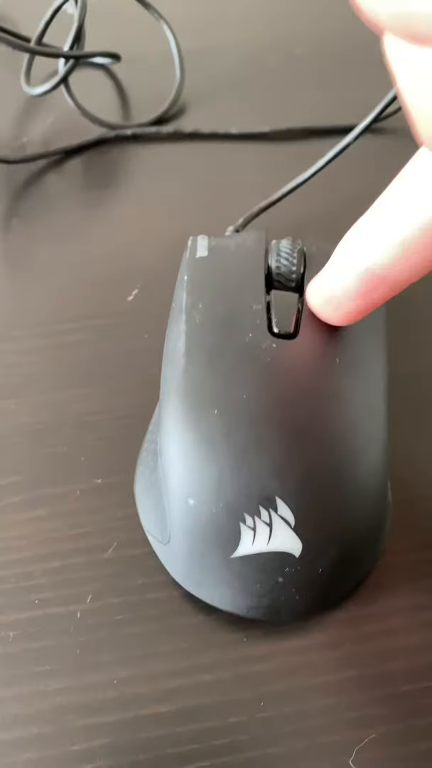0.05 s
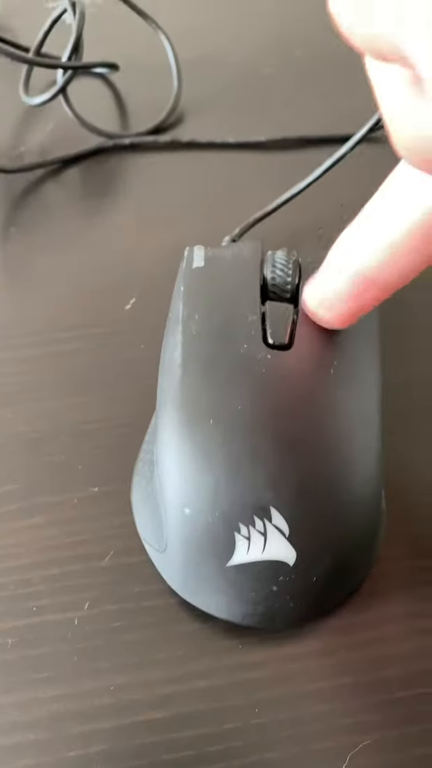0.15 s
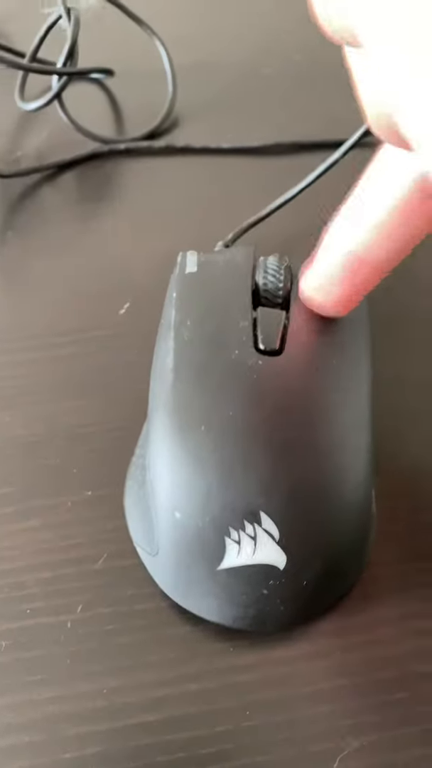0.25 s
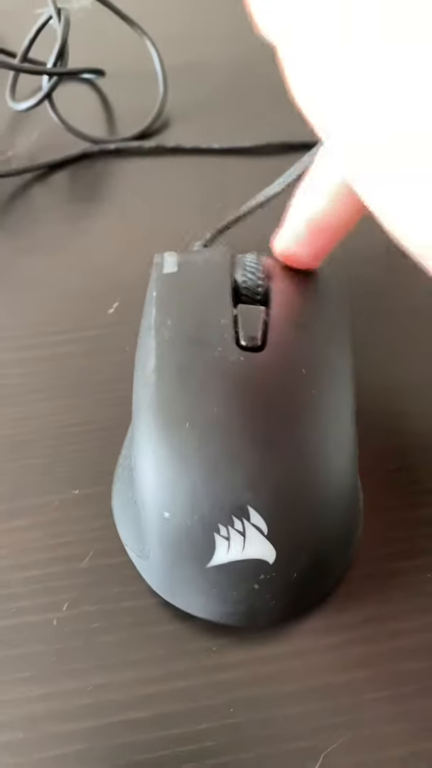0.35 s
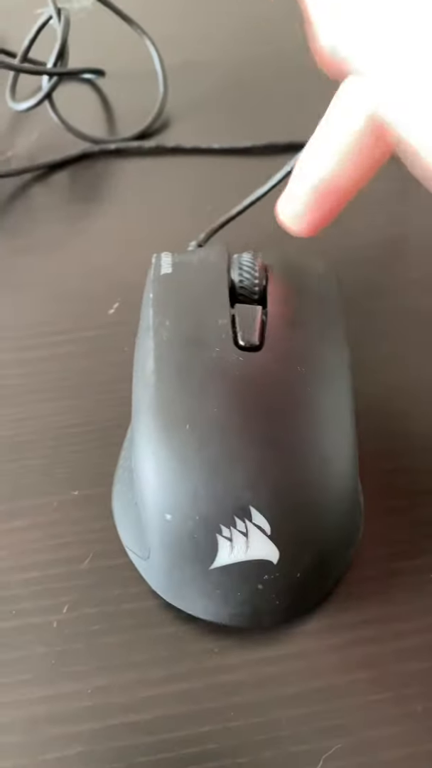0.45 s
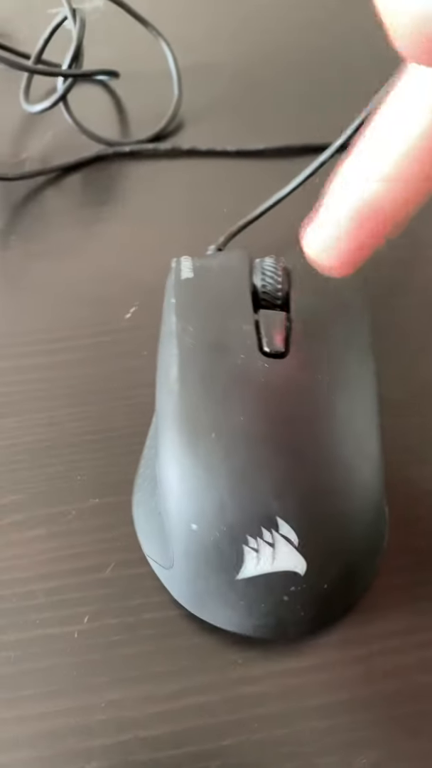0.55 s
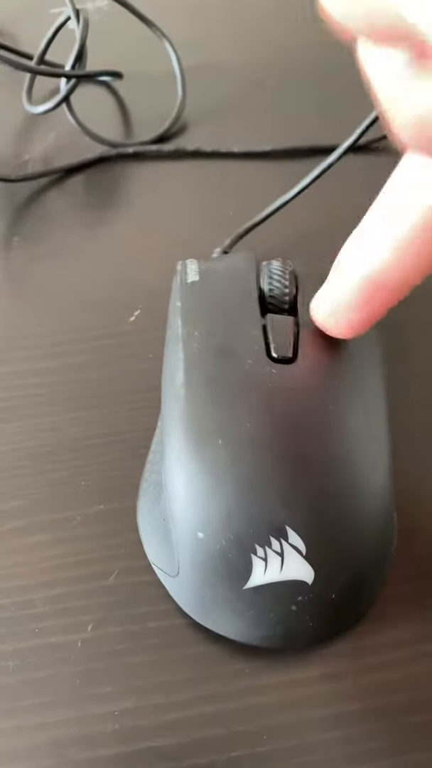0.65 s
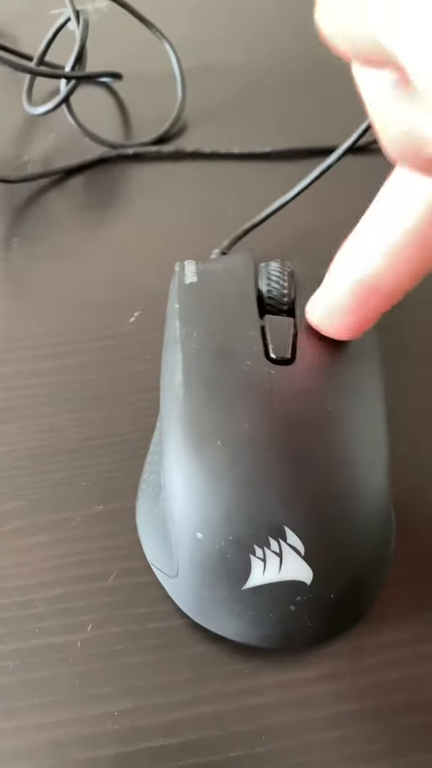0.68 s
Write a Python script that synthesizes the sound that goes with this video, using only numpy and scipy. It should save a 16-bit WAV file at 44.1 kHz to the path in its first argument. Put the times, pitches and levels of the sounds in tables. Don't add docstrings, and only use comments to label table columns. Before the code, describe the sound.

A finger flutters on a mouse button, making sharp, dry, uneven clicks in quick bursts

```python
import sys
import numpy as np
from scipy import signal
from scipy.fft import rfft, irfft
from scipy.io import wavfile

SR = 44100
rng = np.random.default_rng(int(sys.argv[2]) if len(sys.argv) > 2 else 0)


def transcribe(u):
    v = np.clip(np.atleast_2d(u).T, -1, 1)
    q = np.round(v * 32767).astype(np.int16)
    wavfile.write(sys.argv[1], SR, q)


def to_linear_factor(level_db):
    exponent = np.asarray(level_db, float) / 20
    return 10 ** exponent


N = 99225

# [t/s, level/dB, shell knock/dB, treble tilt/dB per octave, contact/ms]
SNAPS = [(0.071, -45.5, 3.5, 2.5, 0.66), (0.1145, -38.5, 4.5, -7.5, 0.75), (0.1622, -31, 3.5, -2, 0.57),
         (0.216, -20.5, -10, 2, 0.82), (0.272, -19.5, -9, 4, 1.5), (0.3445, -16, -9.5, 1, 0.71),
         (0.347, -20, -4.5, -1.5, 1.12), (0.4084, -17.5, -14.5, -2.5, 1.75), (0.6911, -15, -12.5, 10, 0.32),
         (0.7524, -17.5, -7.5, 0.5, 1.3), (0.7972, -22.5, -7, 7, 0.66), (0.8019, -14, -6, -4.5, 0.95),
         (0.8521, -20.5, -22, 3.5, 1), (0.8591, -18.5, -21, 2.5, 0.87), (0.8679, -22.5, -7.5, 6, 0.78),
         (0.89, -17.5, -6.5, 1.5, 2.4), (0.9159, -17.5, -6, 10, 1), (0.9226, -21.5, -6.5, 3.5, 0.88),
         (0.965, -17, -8, 4, .8), (1.1561, -17, -14, -5.5, 0.46), (1.2163, -21, -24, -3, 1.4),
         (1.276, -19.5, -1.5, 3, 0.71), (1.3287, -19, -12.5, 2.5, 1.1), (1.3676, -18.5, -26.5, 6.5, 0.57),
         (1.3777, -19.5, 0.5, 2, 0.76), (1.4601, -19, -13, 10.5, 1.2), (1.7122, -17.5, -18, 9, 0.24),
         (1.7465, -21, -8.5, 3, 1.3), (1.7854, -16.5, -15.5, -0.5, .6), (1.9731, -15, -13.5, 4, 0.98)]
# [f/Hz, level/dB, t60/s]
SPRING_MODES = [(4300, -19, .003), (5200, -15, .004), (5700, -15, .003), (6500, -5, .003), (6950, 0, .004),
                (7600, -6, .003), (8500, -12, .003), (9500, -11, .003), (10300, -11, .004),
                (11400, -17, .003), (12500, -14, .003), (13400, -10, .004), (14500, -23, .003),
                (15500, -19, .003)]
# [f/Hz, level/dB, t60/s]
SHELL_MODES = [(492, -13, 0.041), (581, -11.5, 0.018), (703, -12.5, 0.036), (796, -8.5, 0.033),
               (872, -12, 0.037), (921, -8, 0.0078), (1248, -11, 0.0078), (1570, -12, 0.0057),
               (2056, -13, 0.007), (2390, -12.5, 0.017), (2930, -14.5, 0.017), (3730, -4.5, 0.0019),
               (5600, -2.5, 0.0033)]
SHELL_ALIKE = 0.5


def ring(x, hz, t60):
    pole = np.exp(2j * np.pi * hz / SR - np.log(1000) / (t60 * SR))
    return signal.lfilter([1], [1, -pole], x).imag


def place(times, shapes):
    length = shapes.shape[1]
    out = np.zeros(N + length)
    starts = (np.asarray(times) * SR).astype(int)
    np.add.at(out, starts[:, None] + np.arange(length), shapes)
    return out[:N]


def band(x, hz):
    return signal.sosfilt(signal.butter(2, hz, "band", fs=SR, output="sos"), x)


def thin(x):
    return signal.sosfilt(signal.butter(4, 3300, "high", fs=SR, output="sos"), x)


def push(ms):
    u = np.arange(1024) / SR / (np.clip(ms, .05, 20)[:, None] / 1000)
    force = np.sin(np.pi * np.clip(u + .05, 0, 1)) ** 2
    return force / force.sum(axis=1, keepdims=True)


def strike(modes, detune):
    f, _, t60 = np.array(modes).T
    t = np.arange(int(t60.max() * SR)) / SR
    fade = np.exp(-np.log(1000) * t / t60[:, None])
    return np.sin(2 * np.pi * (f * detune)[:, :, None] * t) * fade


def pair(modes, times, db, shapes, alike, signs=(-1, 1), detune=.05):
    # [f/Hz, level/dB]
    lean_table = [(100, -7), (300, 4.5), (650, 11), (1300, -1.9), (2800, 9), (5000, 9.8)]
    lean_hz, lean_db = np.array(lean_table).T
    f, level_db, _ = np.array(modes).T
    lean = np.interp(np.log(f), np.log(lean_hz), lean_db) / 2
    chance = rng.standard_normal((len(times), 5, len(modes)))
    a, b = (np.where(chance[:, k] > 0, *signs) * to_linear_factor(-2 * chance[:, k + 2]) for k in (0, 1))
    left = a * to_linear_factor(level_db - lean)
    right = (alike * a + np.sqrt(1 - alike ** 2) * b) * to_linear_factor(level_db + lean)
    rings = strike(modes, 1 + detune * chance[:, -1])
    blows = shapes * to_linear_factor(db)[:, None]
    sides = []
    for mix in (left, right):
        body = np.einsum("ek,ekt->et", mix, rings)
        sides.append(place(times, signal.fftconvolve(blows, body, axes=1)))
    return np.array(sides)


def air():
    # [f/Hz, level/dB per Hz]
    tone = [(30, -10), (80, 5.5), (200, -14.5), (400, -11), (1000, -26), (3000, -30), (11000, -38),
            (14000, -57)]
    f, db = np.array(tone).T
    hz = np.arange(N // 2 + 1) * SR / N
    mid, side = rfft(rng.standard_normal((2, N))) * to_linear_factor(np.interp(np.log(hz + 1), np.log(f), db))
    both = irfft(mid + side * np.clip(hz / 1500, 0, 1) * np.array([[1], [-1]]), N)
    return to_linear_factor(-73) * both / both.std()


def scuff():
    # [t/s, level/dB]
    drag = [(0, -95), (.3, -68), (0.438, -64), (.5, -124), (0.691, -83), (0.861, -52), (1.0, -113),
            (1.2, -73.5), (1.381, -61), (1.501, -74.5), (1.56, -120), (1.695, -110), (1.72, -62),
            (1.801, -68.5), (1.892, -59.5), (1.959, -71.5), (2.051, -90), (2.201, -103.5), (2.25, -66.5)]
    s, db = np.array(drag).T
    pressure_db = np.interp(np.arange(N) / SR, s, db)
    grit_db = 3 * np.repeat(rng.standard_normal(N // 128 + 1), 128)[:N]
    grit = rng.standard_normal((3, N)) * to_linear_factor(pressure_db + grit_db)

    def body(x, modes):
        out = 0
        for f, level_db, t60 in modes:
            damped = t60 * .3
            out = out + to_linear_factor(level_db) * ring(x, f, damped) / np.sqrt(damped * SR / 28)
        return out

    left = body(grit[0], SHELL_MODES)
    right = to_linear_factor(8) * body(0.24 * grit[0] + 0.37 * grit[1], SHELL_MODES)
    hiss = signal.lfilter(*signal.butter(4, 12100, fs=SR), grit[2])
    return np.array([left, right]) + to_linear_factor(-16.5) * thin(body(hiss, SPRING_MODES))


def switch():
    # [t/s, level/dB, shell knock/dB]
    ticks = [(.3794, -35.5, 14.5), (.3833, -40, 15.5), (.2259, -39, 6), (0.6884, -39, 10),
             (0.6946, -30.5, 3), (.736, -34, 5), (0.7632, -40, 4.5), (0.8406, -44, -15.5),
             (0.8462, -35, -5), (1.1492, -41, 4), (1.208, -30, -4.5), (1.2228, -32, 0.5), (1.283, -25, 5.5),
             (1.320, -38, 9.5), (1.4751, -31, 1.5), (1.706, -38, 4), (1.7237, -40, 1.5), (1.852, -52, -7.5),
             (1.8778, -45, 9), (1.8922, -32.5, -1), (1.9677, -34.5, 6), (2.223, -56, 4.5), (2.2356, -36, 2)]
    tick_treble_db, tick_ms = -4, 0.57
    events = SNAPS + [row + (tick_treble_db, tick_ms) for row in ticks]
    s, db, shell_db, treble_db, ms = np.array(events).T
    ms = np.clip(ms, .2, 2)[:, None]
    t = np.arange(1200) / SR * 1000 - 10
    start = s - .0104

    def swell(rise, fall):
        return np.clip(t / rise, 0, 1) ** 2 * np.exp(-np.maximum(t - rise, 0) / fall)

    def peak(x):
        return abs(x).max(axis=1, keepdims=True)

    contact = swell(ms, ms * 1.1)
    noise = rng.standard_normal((len(s), 3, 1200))
    lead_in = to_linear_factor(-26) * np.exp(-abs(t) / 3)
    burst = noise[:, 0] * (contact + lead_in)

    octaves = np.log2(np.array(SPRING_MODES)[:, 0] / 7000)
    scatter_db = 1.5 * rng.standard_normal((len(s), len(SPRING_MODES)))
    mix = to_linear_factor(scatter_db + treble_db[:, None] * octaves)
    metal = 0
    for k, (f, level_db, t60) in enumerate(SPRING_MODES):
        mode = ring(burst, f, min(t60, .006))
        metal = metal + (-1) ** k * to_linear_factor(level_db) * mix[:, k, None] * mode
    metal = thin(metal)
    crack = band(burst, (1500, 5880))
    metal = metal / peak(metal) + to_linear_factor(-13) * crack / peak(crack)
    metal *= to_linear_factor(db)[:, None] / peak(metal)

    grit = to_linear_factor(6 * np.repeat(noise[:, 2, :40], 30, axis=1))
    rattle = noise[:, 1] * grit * swell(2.24, 6.45)
    rattle /= np.sqrt((rattle ** 2).sum(axis=1, keepdims=True))
    shell = pair(SHELL_MODES, start, db + shell_db - 6.5, rattle, SHELL_ALIKE)

    splash = band(rng.standard_normal((len(s), 2, 1200)) * contact[:, None], (7000, 15000))
    splash *= (to_linear_factor(db - 13 + treble_db) / abs(splash).max(axis=(1, 2)))[:, None, None]
    return np.array([place(start, metal + splash[:, k]) for k in (0, 1)]) + shell


def room(x):
    t = np.arange(int(.5 * SR)) / SR
    noise = rng.standard_normal((3, len(t)))
    dull = signal.lfilter(*signal.butter(4, 10600, fs=SR), noise)
    tail = dull + (noise - dull) * np.exp(-t / .007)
    gap_ms, t60_s = 3, 0.19
    tail *= to_linear_factor(-60 * t / t60_s) * np.clip(t * 1000 / gap_ms, 0, 1) ** 2
    wide = to_linear_factor(-25.5) * tail[1:]
    tail = (tail[0] + wide) / np.sqrt((tail[0] ** 2).sum())
    return to_linear_factor(-14.5) * signal.fftconvolve(x, tail, axes=1)[:, :N]


def desk():
    # [t/s, level/dB, contact/ms, sway/dB]
    thuds = [(0.158, -48, 0.95, -51), (0.222, -41, 1.43, -46.5), (0.279, -41, 0.71, -50),
             (0.349, -32, 29, -25.5), (0.364, -26.5, 4.5, -36), (0.383, -18.5, 1.8, -39),
             (0.398, -30, 2.9, -46), (0.404, -55, 1.7, -61), (0.695, -43, 2.6, -33.5),
             (0.729, -26, 8.2, -57.5), (0.758, -40, 1.55, -40.5), (.812, -20.5, 8.4, -34.5),
             (0.843, -22, 4.5, -33), (0.854, -48, 5.1, -52), (0.89, -46, 5.1, -54),
             (0.937, -36.5, 6.6, -32.5), (1.155, -46, 1.1, -45.5), (1.223, -44, 3.2, -36.5),
             (1.282, -28, 5.1, -35), (1.314, -21.5, 13, -46.5), (1.383, -45, 1.3, -33),
             (1.419, -23.5, 8.3, -32.5), (1.469, -59, 12, -57), (1.728, -60, 3.5, -35.5),
             (1.759, -40.5, 1.9, -50.5), (1.83, -43, 1.6, -53), (1.88, -45, 2.3, -38.5),
             (1.94, -32, 10.7, -40), (1.978, -46.5, 3.2, -50.5)]
    # [f/Hz, level/dB, t60/s]
    top_modes = [(101.6, -5.5, 0.2), (155.8, -5, 0.09), (190.2, -6, 0.092), (212.4, -5.5, 0.031),
                 (262.3, -1, 0.096), (302.5, -6.5, 0.11), (353.5, -5, 0.15), (390.4, -5, 0.17),
                 (489, -7, 0.16), (586, -2.5, 0.14), (784, -0.5, 0.1)]
    s, db, ms, sway_db = np.array(thuds).T
    snap_s, snap_db = np.array(SNAPS)[:, :2].T
    top = pair(top_modes, s, db - 9, push(ms), 1.0, signs=(-1, -1), detune=.025)
    top = top + pair(top_modes, snap_s, snap_db - 36, push(0 * snap_s + 1.63), 0.93)

    t = np.arange(SR // 2) / SR
    rumble_hz, rumble_t60_s = 233, 0.33
    tail = signal.lfilter(*signal.butter(2, rumble_hz, fs=SR), rng.standard_normal(len(t)))
    tail *= to_linear_factor(-60 * t / rumble_t60_s)
    weight = np.sqrt((signal.lfilter([1], [1, -.98], tail) ** 2).sum())
    rumble = signal.fftconvolve(top, tail[None] / weight * 8, axes=1)[:, :N]

    press = place(s, push(0 * s + 13) * to_linear_factor(sway_db)[:, None])
    sway = ring(press, 37.58, 0.7)
    rock = to_linear_factor(-10.5) * ring(press, 47, 0.3)
    return top + to_linear_factor(-9) * rumble + sway + rock


def knocks():
    # [t/s, level/dB, contact/ms]
    stops = [(.352, -25.5, 0.5), (.357, -29.5, 0.29), (0.3797, -19.5, 0.21), (.388, -24.5, 1),
             (0.4137, -19.5, 0.77), (.696, -30.5, 0.43), (0.8023, -19, 0.02), (.816, -34.5, 0.49),
             (0.871, -31.5, 0.63), (0.927, -33, 0.14), (1.281, -22, .4), (1.222, -41.5, 0.43),
             (1.372, -38.5, 0.63), (1.478, -36.5, 0.12), (2.226, -78, 0.3)]
    s, db, ms = np.array(stops).T
    return pair(SHELL_MODES, s, db - 2.5, push(ms), SHELL_ALIKE)


def scene():
    near = switch() + knocks() + scuff()
    return near + room(near) + desk() + air()


def band_limit(x):
    return signal.sosfilt(signal.butter(12, 17310, fs=SR, output="sos"), x)


def record(dry):
    # [f/Hz, lag/rad]
    ports = [(2300, .4), (5000, .6), (7000, 2.6), (8000, 3.8), (10400, 6.28), (12600, 8.7), (14300, 10.1),
             (15700, 11.8), (16500, 15), (21000, 18)]
    f, rad = np.array(ports).T
    hz = np.arange(N // 2 + 1) * SR / N
    lag = np.exp(-1j * np.interp(hz, np.r_[0, f], np.r_[0, rad]))
    x = np.array([dry[0], irfft(rfft(dry[1]) * lag, N)])
    x = signal.sosfilt(signal.butter(12, 16200, fs=SR, output="sos"), x)
    x = signal.sosfilt(signal.butter(4, 36.4, "high", fs=SR, output="sos"), x)
    return band_limit(x)


dry = scene()
out = record(dry)
transcribe(out)
```